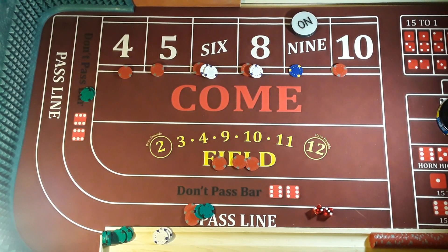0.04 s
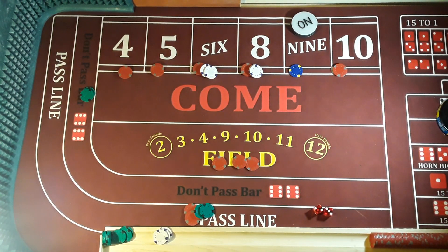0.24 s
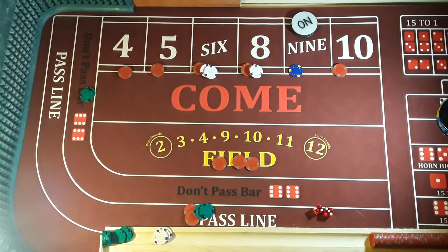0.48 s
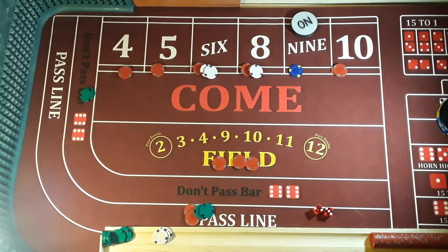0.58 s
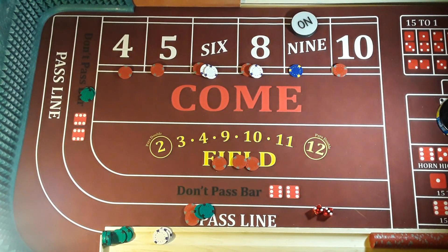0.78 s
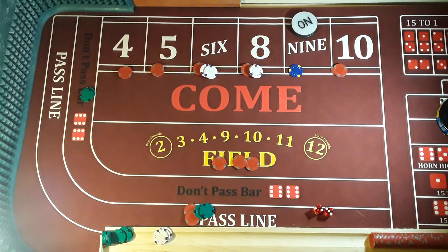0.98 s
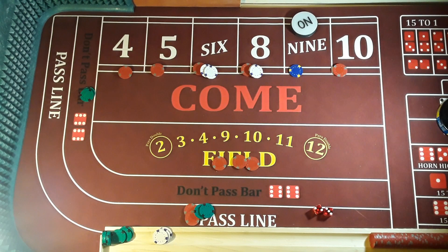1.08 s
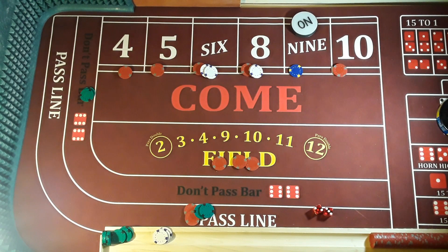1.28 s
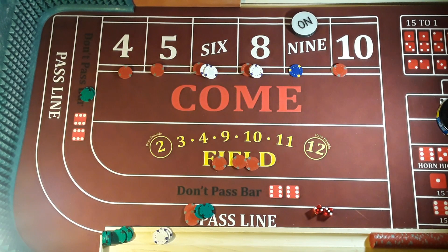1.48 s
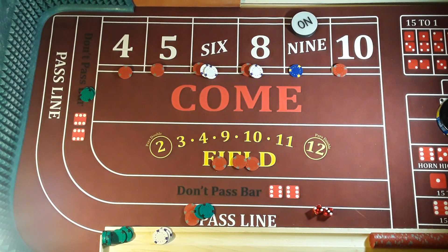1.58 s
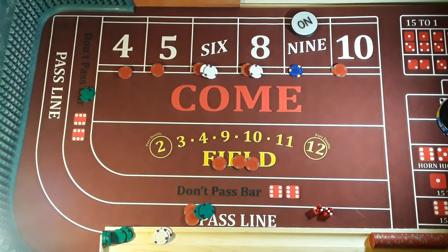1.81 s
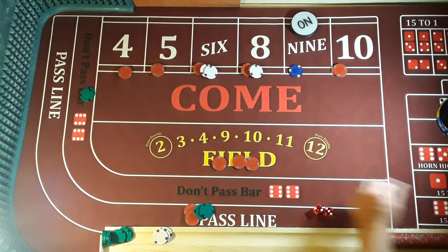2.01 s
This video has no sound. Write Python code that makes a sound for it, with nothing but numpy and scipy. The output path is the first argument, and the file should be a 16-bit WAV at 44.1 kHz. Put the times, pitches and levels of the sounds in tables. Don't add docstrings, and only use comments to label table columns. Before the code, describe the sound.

Small stacks of hard plastic chips dropped, scraped and tapped on a padded table, close up

```python
import sys
import numpy as np
from scipy import signal
from scipy.fft import rfft, irfft, next_fast_len
from scipy.io import wavfile
from scipy.ndimage import uniform_filter1d

SR = 44100
rng = np.random.default_rng(int(sys.argv[2]) if len(sys.argv) > 2 else 0)


def attenuation_scalar(level_db):
    decades = np.asarray(level_db, float) / 20
    return 10 ** decades


def generate_wav(sig):
    pcm = np.round(np.clip(np.atleast_2d(sig).T, -1, 1) * 32767).astype(np.int16)
    wavfile.write(sys.argv[1], SR, pcm)


N = 90404

# [f/Hz, level/dB]
HISS_COLOUR = [(25, -13), (70, -1.5), (300, 0), (2000, -8.5), (4000, -14.5), (7000, -24.5), (12000, -17.5),
               (16000, -13.5)]
# [t/s, level/dB]
SLIDE_LEVEL = [(0, -62.5), (.11, -91), (0.128, -64), (.17, -55), (0.198, -54), (0.758, -85.5), (.8, -64),
               (.85, -94), (.92, -97), (.93, -67), (1.04, -68.5), (1.07, -58), (1.272, -94), (1.283, -59),
               (1.3, -47.5), (1.32, -84), (1.601, -73), (1.646, -71)]
# [f/Hz, level/dB]
RUB_COLOUR = [(150, -1.5), (450, 5.5), (1500, -1), (3000, -2), (5000, -7.5), (6300, -4), (7500, -25.5),
              (15000, -26)]
# [t/s, level/dB, f/Hz]
TABLE_THUDS = [
    (.315, -47, 95),
    (.378, -49, 280),
    (.41, -54, 155),
    (1.297, -44, 112),
    (1.2985, -37, 360),
    (1.48, -57, 110),
    (1.65, -56, 90),
    (1.07, -58, 143),
    (.18, -54, 314),
    (.04, -58, 430),
]
# [start t/s, swell t/s, fade t/s, level/dB]
PICK_BURSTS = [
    (.168, .020, .005, -32.5),
    (0.38, 0.00052, 0.02, -43.5),
    (.3265, 0.000304, 0.0016, -24),
    (0.21, 0.00094, 0.0081, -44),
    (0.11, 0.0043, 0.016, -66.5),
    (1.2985, 0.0015, 0.02, -37.5),
]
# [f/Hz, width/Hz, level/dB]
PICK_TONES = [(1500, 800, -2), (2650, 1100, 2), (4110, 1290, -0.5), (6070, 830, -4), (10300, 2100, -13),
              (12670, 1300, -15), (14950, 1560, -15.5)]
# [start t/s, swell t/s, fade t/s, level/dB]
DRAG_BURSTS = [
    (.3212, 0.0004, 0.0024, -35),
    (.326, 0.00038, 0.036, -41),
    (1.301, .002, 0.017, -50),
    (.12, .003, 0.025, -60.5),
    (1.279, 0.0011, 0.016, -56.5),
]
# [f/Hz, width/Hz, level/dB]
DRAG_TONES = [(6200, 290, 1.5), (3830, 540, -11)]
# [t/s, level/dB, f/Hz, length/cycles]
FELT_KNOCKS = [(.1715, -35, 1340, 0.96), (.185, -30.5, 1500, 0.7), (.2352, -28.5, 1220, 2),
               (.2395, -30.5, 1255, 1.1), (.249, -35, 2380, 1.6), (.254, -38, 1810, 1.3),
               (.2362, -26, 2250, 1.1), (.2859, -10, 1800, 0.67), (.2885, -22, 1840, 1.5),
               (.322, -19, 1580, 0.49), (.3255, -18, 1670, 0.59), (.3275, -17, 2220, 0.77),
               (.3295, -23, 1500, .8), (.3335, -16.5, 2260, 0.96), (.3405, -19, 2450, 1.1),
               (.3462, -24, 1630, 0.85), (.357, -20, 1800, 0.47), (.379, -23, 1159, 1.09),
               (1.0457, -11.5, 2100, 0.9), (1.0478, -24, 1910, 1.3), (1.052, -26, 2100, 0.73),
               (1.0575, -16.5, 1870, 1.45), (1.0675, -22.5, 1850, 0.94), (1.0965, -26.5, 2180, 0.95),
               (1.0648, -15, 1900, 0.61), (1.0724, -17.5, 1900, 0.56), (1.0762, -17, 1820, 1.2),
               (1.084, -19.5, 1900, 0.57), (1.0915, -21, 2680, 0.71), (1.4612, -18, 1850, 0.78),
               (1.4635, -25.5, 1740, 0.66), (1.4685, -27.5, 2280, 0.64), (1.4735, -26.5, 1850, 0.59),
               (1.4765, -29, 2140, 0.52), (1.7113, -18, 1630, 0.59), (1.7135, -20, 2310, 1.14),
               (1.7175, -25, 2220, 0.74), (1.724, -20, 1930, 0.76), (1.737, -23.5, 1500, 0.53),
               (1.7475, -22, 2020, 0.78), (1.7395, -25, 1860, 0.73), (.8215, -50.5, 1980, 0.96)]
# [start t/s, swell t/s, fade t/s, level/dB]
DROP_BURSTS = [
    (.3750, 0.00022, 0.002, -13),
    (.3778, 0.00077, .0042, -14.5),
    (.3880, 0.00066, 0.0017, -23.5),
    (.2860, 0.000555, 0.0034, -37),
    (1.4610, 0.00027, 0.00114, -30),
    (1.0457, 0.00042, 0.025, -41.5),
    (1.711, 0.0012, 0.029, -41),
]
# [f/Hz, width/Hz, level/dB]
DROP_TONES = [(1705, 464, -3.5), (2020, 454, -2), (2435, 274, 0.5), (3350, 526, 0), (3854, 610, 0.5),
              (4690, 1140, -8), (5850, 740, -13.5), (7350, 620, -23), (11400, 3050, -38)]
# [t/s, level/dB, f/Hz, length/cycles]
RAIL_KNOCKS = [(.327, -32, 644, 1), (.339, -28.5, 610, 1.2), (.376, -22, 692, 1.05),
               (1.05, -39.5, 703, 2.1), (1.075, -40, 700, 2), (1.2980, -21.5, 618, 0.88),
               (1.3010, -24, 645, 0.71), (1.3040, -24.5, 950, 0.71), (1.3068, -23.5, 575, .6),
               (1.2982, -30.5, 1390, 0.64), (1.3035, -33, 1500, 1.25), (1.322, -30, 867, 2.04),
               (1.463, -33.5, 663, 1.1), (1.4745, -37.5, 706, 0.94), (1.6485, -30.5, 601, 0.93),
               (1.712, -31, 583, 1.04), (1.618, -53, 830, 2)]
# [start t/s, swell t/s, fade t/s, level/dB]
SCRAPE_BURSTS = [
    (1.3305, .004, .005, -25),
    (1.3388, 0.00089, .0025, -21),
    (1.3035, 0.0024, 0.0023, -45),
    (1.278, 0.002, 0.023, -45.5),
]
# [f/Hz, width/Hz, level/dB]
SCRAPE_TONES = [(1850, 880, -8), (3043, 820, -2.5), (4580, 570, -0.5), (5730, 903, -6), (6390, 680, -8.5),
                (9160, 1600, -9.5), (10530, 890, -8), (12400, 1300, -11), (14900, 2200, -15.5)]
# [start t/s, swell t/s, fade t/s, level/dB]
TAP_BURSTS = [
    (1.6480, 0.0003, 0.0035, -23.5),
    (1.652, 0.00089, 0.0041, -24.5),
]
# [f/Hz, width/Hz, level/dB]
TAP_TONES = [(1070, 1000, -9.5), (1720, 180, -2), (2550, 480, -1.5), (2100, 500, 2), (3750, 660, -3),
             (4500, 510, -2), (5940, 630, -10.5), (9200, 1340, -16.5), (10460, 1500, -19.5),
             (14500, 3200, -33.5)]
# [delay t/s, how much later at left/samples]
ECHO_TIMES = [(.0040, -9), (.0121, -16), (.0157, 11), (.0062, -20), (.0021, 8)]
# [left level/dB, right level/dB]
ECHO_LEVELS = [(-2, -9), (-12.5, -12), (-14, -20), (-7, -7.5), (-10.5, -14)]
# [f/Hz, level/dB]
ECHO_DULLING = [(300, -16.5), (2000, 2.5), (4000, 5.5), (8000, -12.5), (15000, -15)]
# [f/Hz, t/s]
TAIL_TIMES = [(100, 0.57), (300, 0.4), (1000, 0.46), (2000, 0.31), (4000, 0.32), (8000, 0.23),
              (14000, 0.17)]
# [f/Hz, level/dB]
TAIL_TONE = [(100, 1.5), (500, 1.5), (1500, 1), (5000, 1.5), (14000, 2)]
# [f/Hz, level/dB]
MIC_TONE = [(20, -15), (60, -14), (200, 1), (500, 0.5), (15500, -1), (16300, -21.5)]
# [f/Hz, level/dB]
FAR_PORT_SHADE = [(100, -3.5), (1000, -0.5), (4000, -3.5), (12000, -5.5)]
# [f/Hz, level/dB]
TREBLE_LIMIT = [(15900, 0), (16400, -40)]


def shape(x, points):
    point_hz, point_db = np.array(points, float).T
    n = next_fast_len(x.shape[-1])
    hz = np.arange(n // 2 + 1) * SR / n + 1
    gain = attenuation_scalar(np.interp(np.log(hz), np.log(point_hz), point_db))
    return irfft(rfft(x, n) * gain, n)[..., :x.shape[-1]]


def unit(x):
    return x / np.sqrt(np.mean(x ** 2))


def floor():
    noise = rng.standard_normal((3, N))
    shared = shape(noise[0], [(250, 1), (1200, -12)])
    separate = shape(noise[1:], [(150, 1.4), (900, 5.3)])
    return unit(shape(shared + separate, HISS_COLOUR)) * attenuation_scalar(-67.5 + 4.5)


def clicks(per_s, spread_db):
    chance = rng.random((3, N))
    happens = chance[0] < per_s / SR
    direction = np.sign(chance[1] - .5)
    strength = attenuation_scalar(-spread_db * np.log(1 - chance[2]))
    return unit(happens * direction * strength)


def slides():
    t, level_db = np.array(SLIDE_LEVEL).T
    grain = unit(shape(clicks(9000, 2.1), RUB_COLOUR))
    return grain * attenuation_scalar(np.interp(np.arange(N) / SR, t, level_db, right=-99))


def knocks(rows):
    t = np.arange(int(.12 * SR)) / SR
    out = np.zeros(N + SR)
    for start, db, hz, cycles in rows:
        u = t * hz / cycles
        swell_and_fade = (np.e * u * np.exp(-u)) ** 2
        out[int(start * SR):][:len(t)] += attenuation_scalar(db) * np.sin(2 * np.pi * hz * t) * swell_and_fade
    return out[:N]


def table_thuds():
    return knocks([row + (1.2,) for row in TABLE_THUDS])


def ring(x, modes):
    out = 0
    for k, (hz, width, db) in enumerate(modes):
        r = np.exp(-np.pi * width / SR)
        feedback = [1, -2 * r * np.cos(2 * np.pi * hz / SR), r * r]
        out = out + (-1) ** k * attenuation_scalar(db) * signal.lfilter([1 - r, 0, r - 1], feedback, x)
    return out


def chips(bursts, modes):
    t = np.arange(4096) / SR
    train = np.zeros(N + SR)
    grain = clicks(12000, 2.)
    for start, swell, fade, db in bursts:
        rise = np.clip(t / swell, 0, 1) ** 2
        env = rise * np.exp(-(np.maximum(t - swell, 0) / fade) ** 3)
        burst = grain[int(start * SR):][:len(t)] * env
        for _ in range(6):
            spectrum = rfft(burst)
            burst = irfft(spectrum / (np.abs(spectrum) + 1e-9), len(t))
            burst = burst * env / np.sqrt(uniform_filter1d(burst ** 2, size=40) + 1e-12)
        train[int(start * SR):][:len(t)] += attenuation_scalar(db) * burst
    return ring(train[:N], modes) / np.std(ring(grain, modes))


def picked_up_chips():
    return chips(PICK_BURSTS, PICK_TONES)


def dragged_edges():
    return chips(DRAG_BURSTS, DRAG_TONES)


def felt_knocks():
    return knocks(FELT_KNOCKS)


def dropped_stack():
    return chips(DROP_BURSTS, DROP_TONES)


def rail_knocks():
    return knocks(RAIL_KNOCKS)


def scraped_edges():
    return chips(SCRAPE_BURSTS, SCRAPE_TONES)


def tapped_chips():
    return chips(TAP_BURSTS, TAP_TONES)


def room(echo_db):
    t = np.arange(SR // 2) / SR
    tail_hz, tail_s = np.array(TAIL_TIMES).T
    noise = rng.standard_normal((3, len(t)))
    tail = 0
    freqs = np.log2(np.arange(len(t) // 2 + 1) * 2. + 1)
    for octave in np.arange(6, 15):
        alike = np.clip(0.046 + (1 - 0.046) / (1 + (2. ** octave / 410) ** 2), 0, 1)
        pair = np.sqrt(alike) * noise[0] + np.sqrt(1 - alike) * noise[1:]
        band = np.clip(1 - np.abs(freqs - octave), 0, 1)
        part = irfft(rfft(pair) * band, len(t))
        tail = tail + part * attenuation_scalar(-60 * t / np.interp(octave, np.log2(tail_hz), tail_s))
    echoes = np.zeros((2, len(t)))
    for (delay, later), levels_db in zip(ECHO_TIMES, ECHO_LEVELS):
        echoes[[0, 1], [int(delay * SR + later), int(delay * SR)]] = attenuation_scalar(np.array(levels_db))
    build_up = 1 - np.exp(-t / .009)
    return attenuation_scalar(-30) * shape(tail, TAIL_TONE) * build_up + attenuation_scalar(echo_db) * shape(echoes, ECHO_DULLING)


def in_room(x, echo_db):
    return signal.fftconvolve(x[None], room(echo_db), axes=1)[:, :N]


def scene():
    hiss = floor()
    table = slides() + table_thuds() + felt_knocks()
    rail = rail_knocks()
    lifted = picked_up_chips() + dragged_edges() + dropped_stack() + scraped_edges() + tapped_chips()
    wet = in_room(table + attenuation_scalar(-2.5) * rail, echo_db=0) + in_room(attenuation_scalar(-0.85) * lifted, echo_db=-7)
    left, right = shape(table + rail + lifted + wet, MIC_TONE)
    left = np.roll(shape(left, FAR_PORT_SHADE), 7)
    return attenuation_scalar(2.0) * np.array([left, right]) + hiss


def low_pass(x):
    return signal.sosfilt(signal.butter(12, 16780, fs=SR, output="sos"), x)


def record(dry):
    mix = shape(dry, TREBLE_LIMIT)
    return low_pass(mix)


dry = scene()
out = record(dry)
generate_wav(out)
```